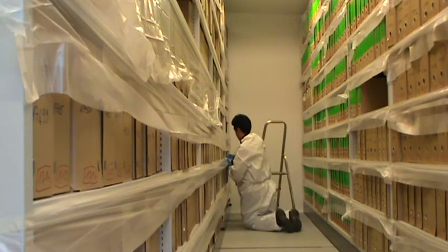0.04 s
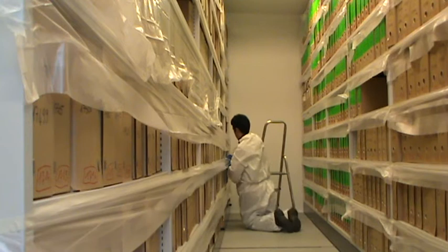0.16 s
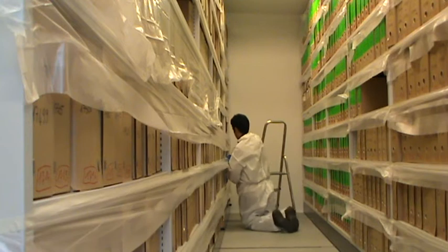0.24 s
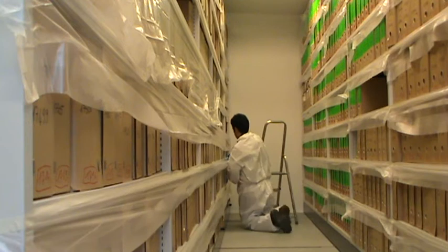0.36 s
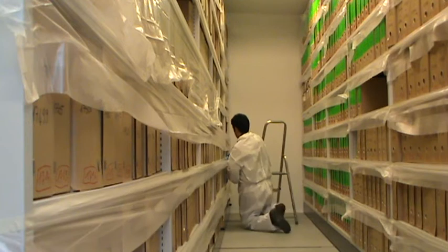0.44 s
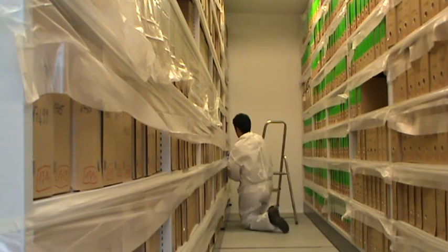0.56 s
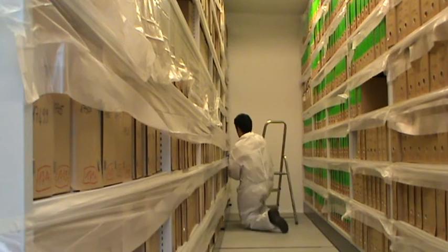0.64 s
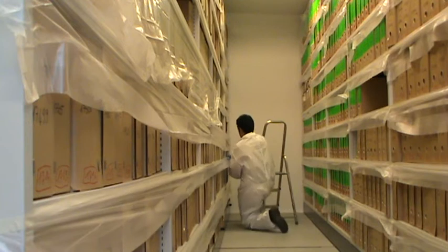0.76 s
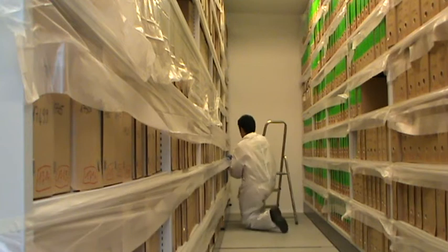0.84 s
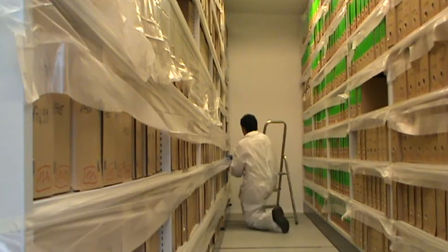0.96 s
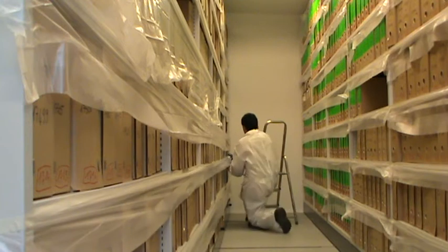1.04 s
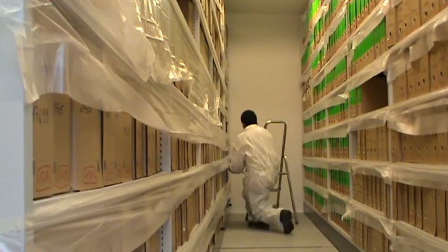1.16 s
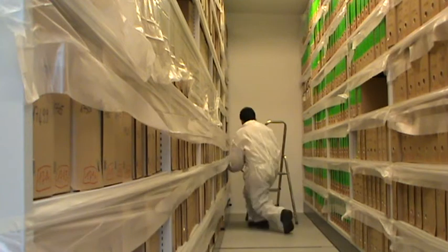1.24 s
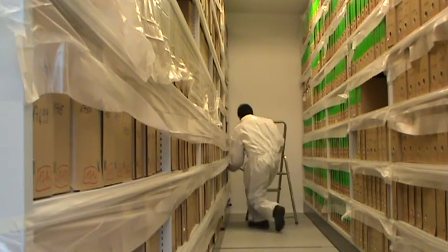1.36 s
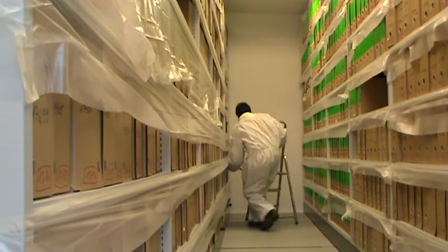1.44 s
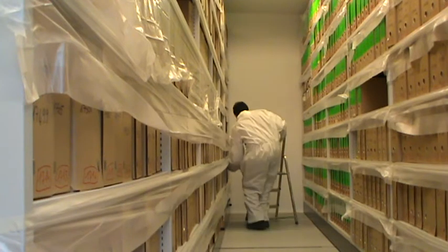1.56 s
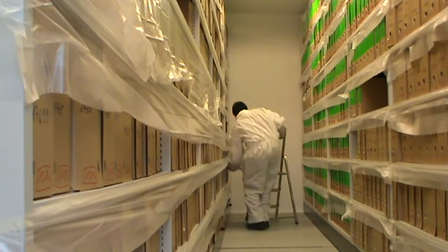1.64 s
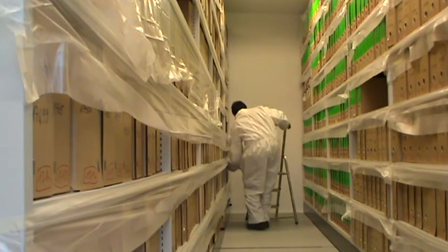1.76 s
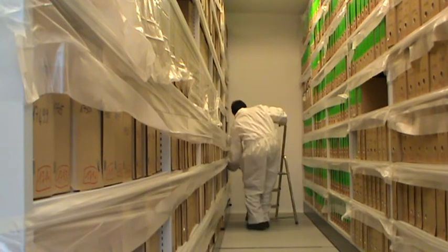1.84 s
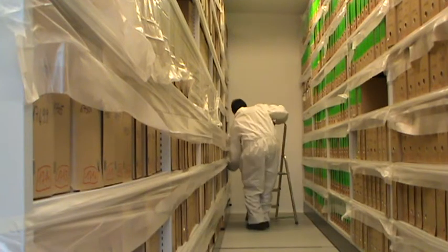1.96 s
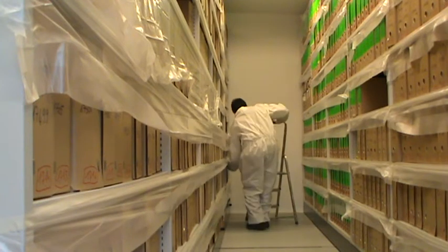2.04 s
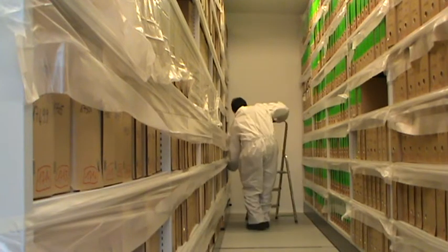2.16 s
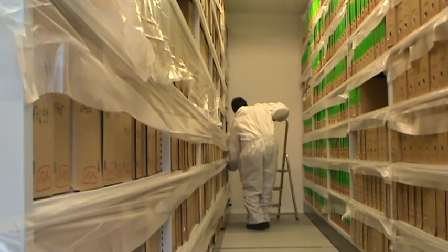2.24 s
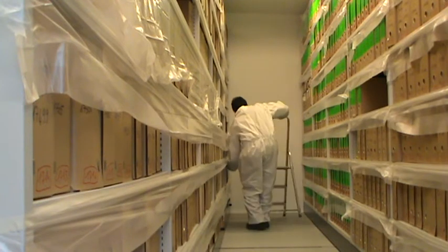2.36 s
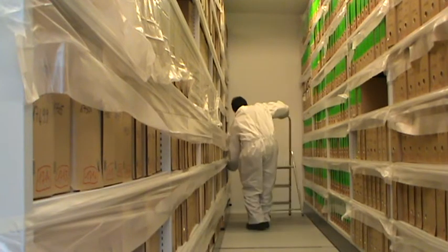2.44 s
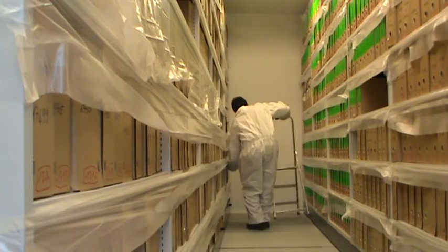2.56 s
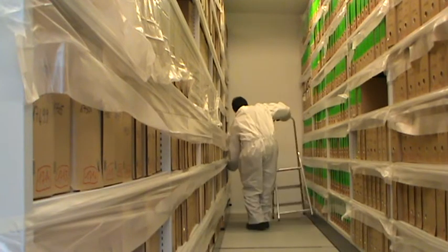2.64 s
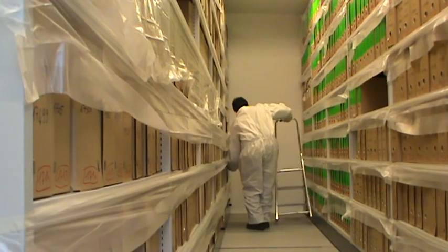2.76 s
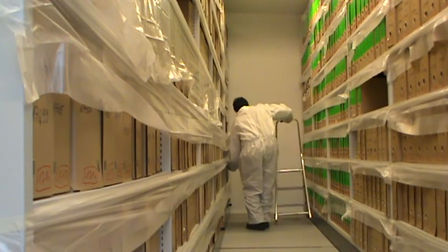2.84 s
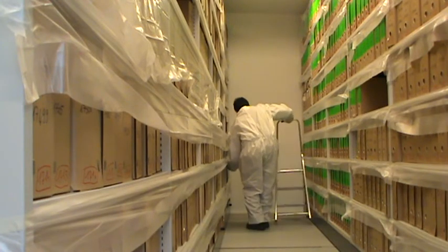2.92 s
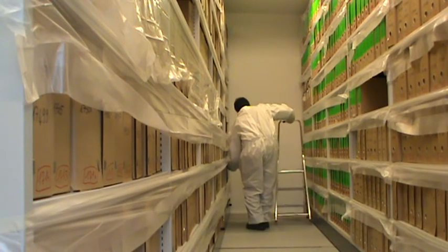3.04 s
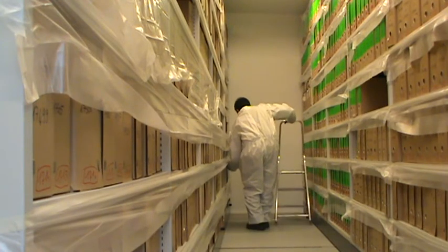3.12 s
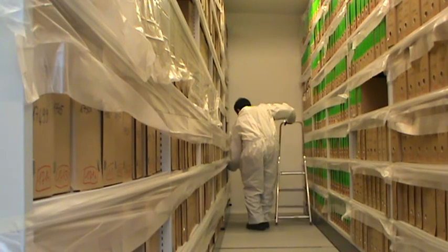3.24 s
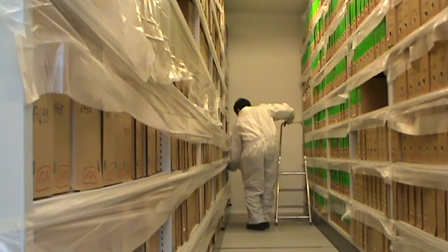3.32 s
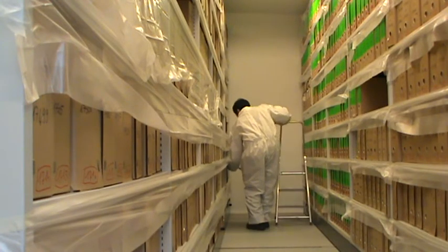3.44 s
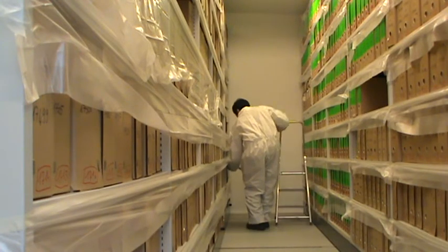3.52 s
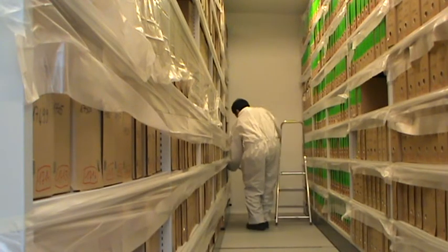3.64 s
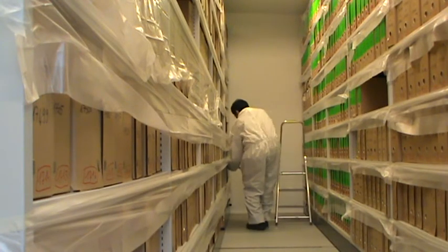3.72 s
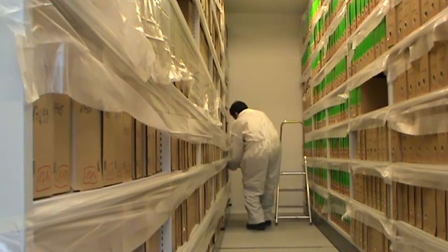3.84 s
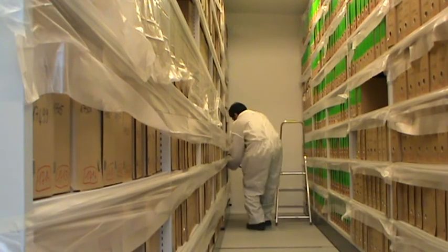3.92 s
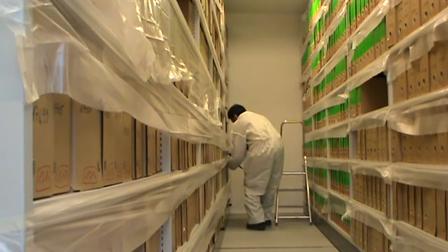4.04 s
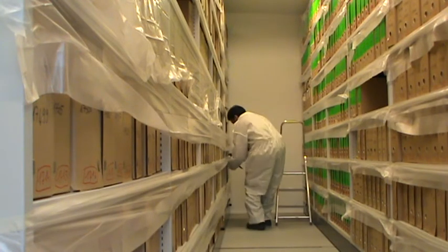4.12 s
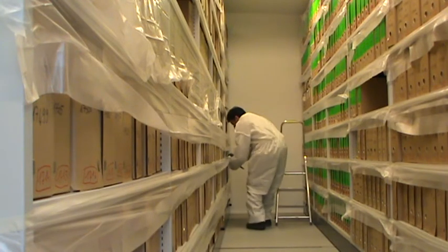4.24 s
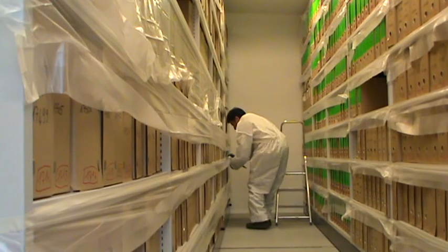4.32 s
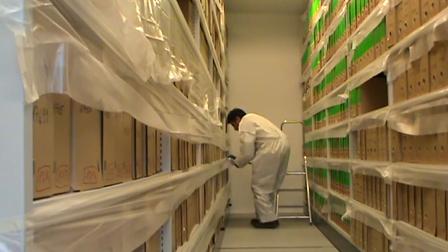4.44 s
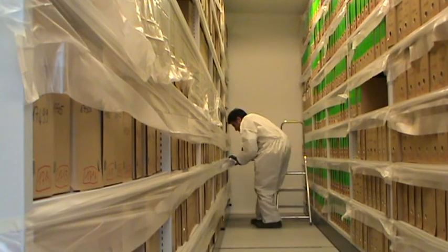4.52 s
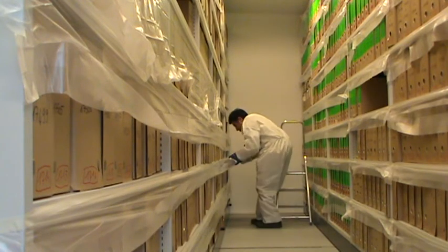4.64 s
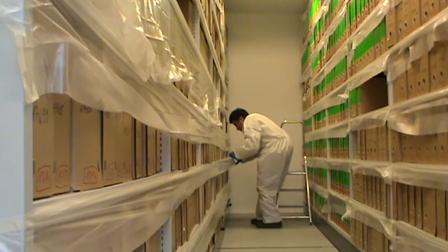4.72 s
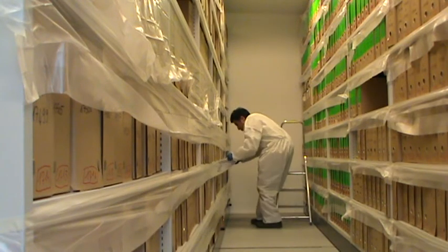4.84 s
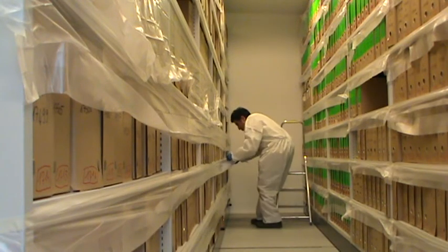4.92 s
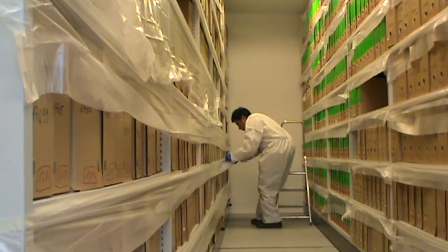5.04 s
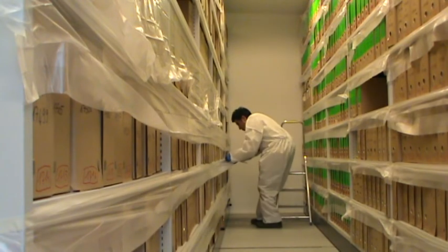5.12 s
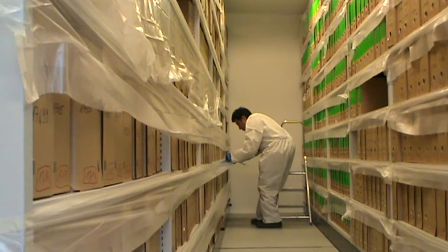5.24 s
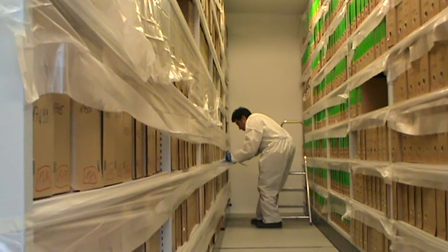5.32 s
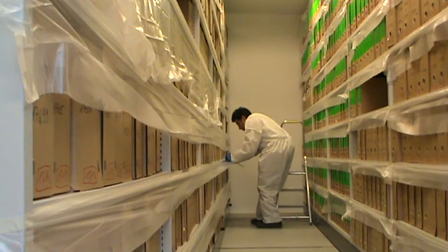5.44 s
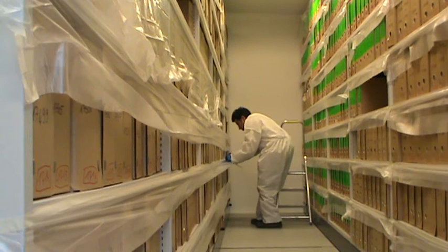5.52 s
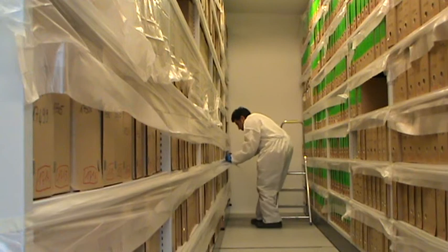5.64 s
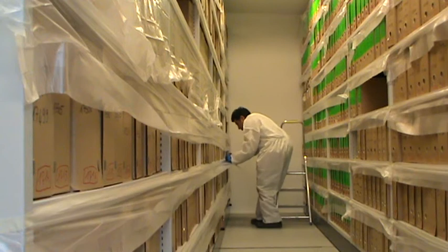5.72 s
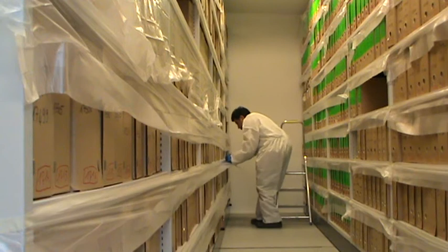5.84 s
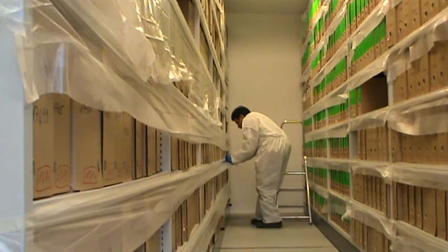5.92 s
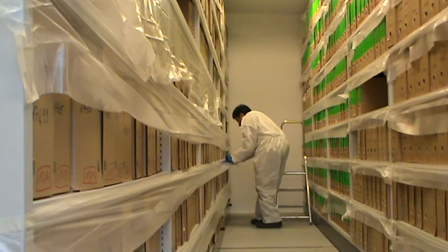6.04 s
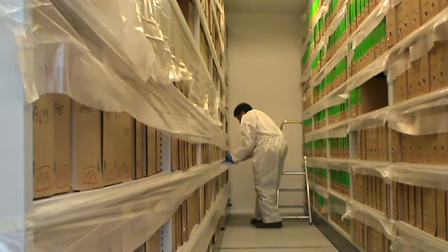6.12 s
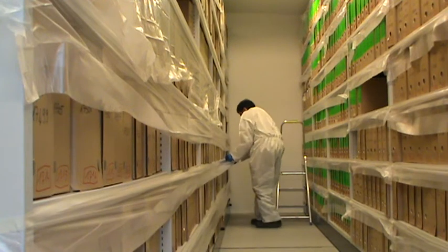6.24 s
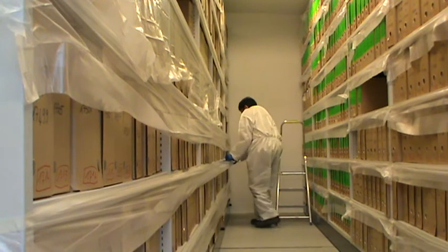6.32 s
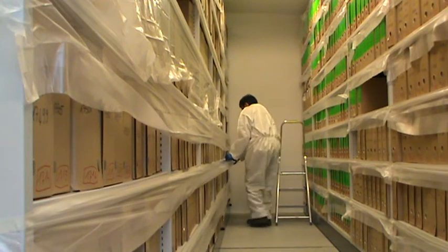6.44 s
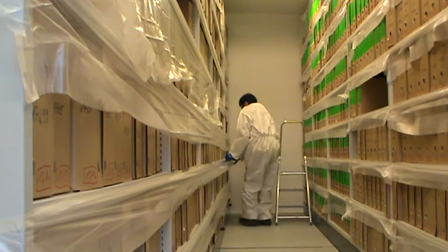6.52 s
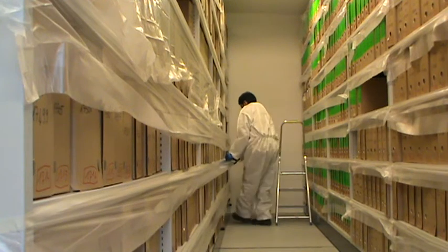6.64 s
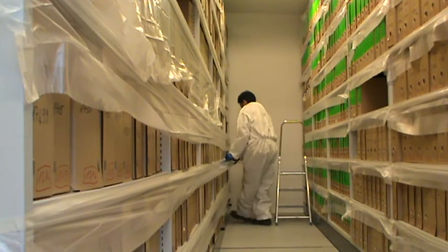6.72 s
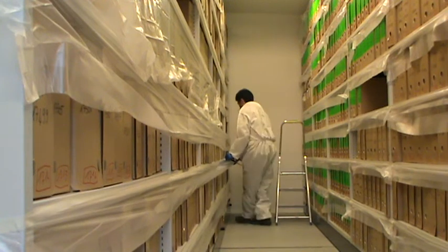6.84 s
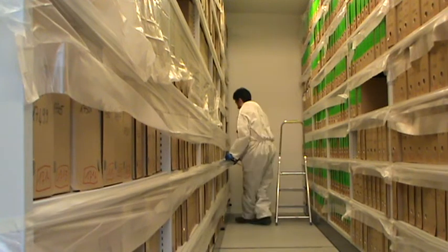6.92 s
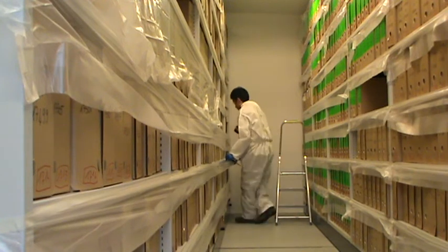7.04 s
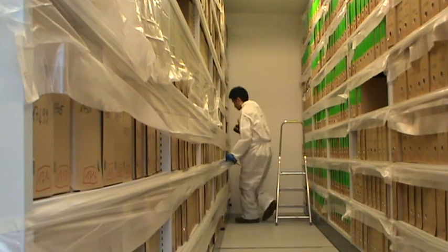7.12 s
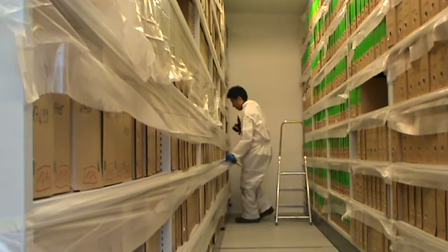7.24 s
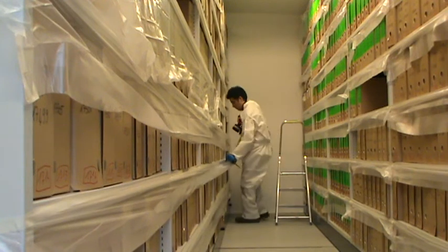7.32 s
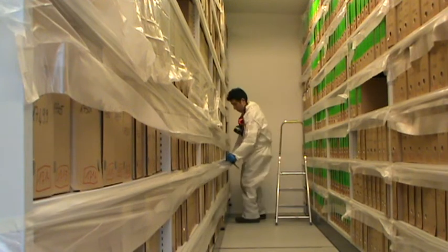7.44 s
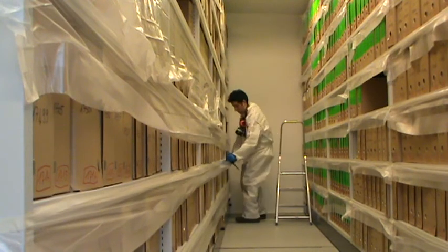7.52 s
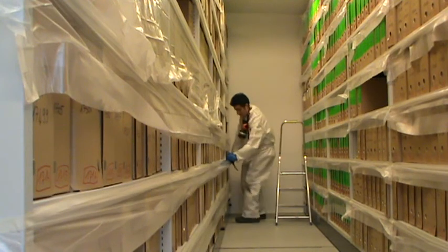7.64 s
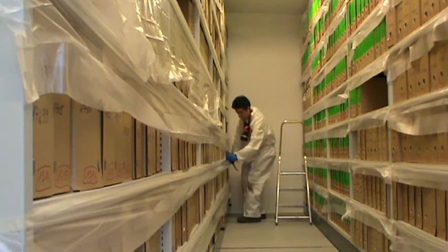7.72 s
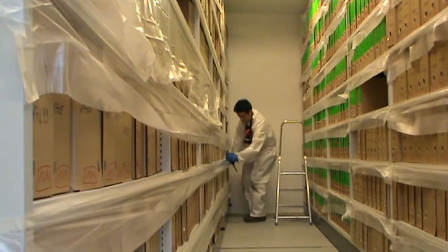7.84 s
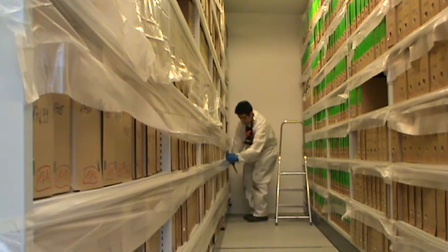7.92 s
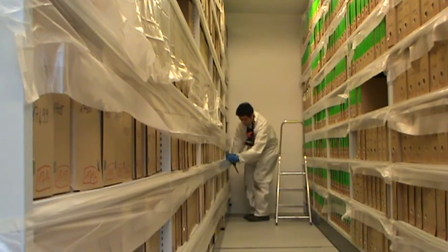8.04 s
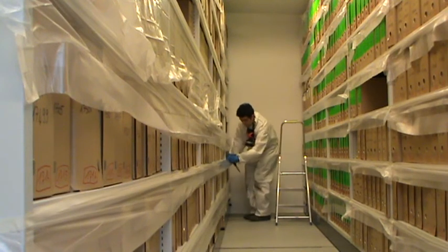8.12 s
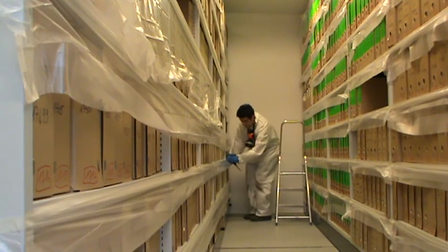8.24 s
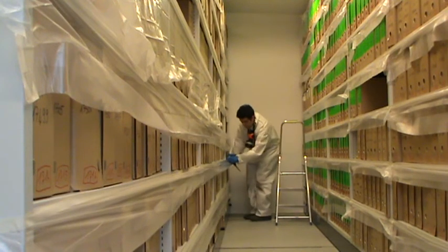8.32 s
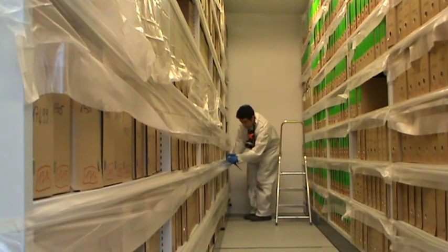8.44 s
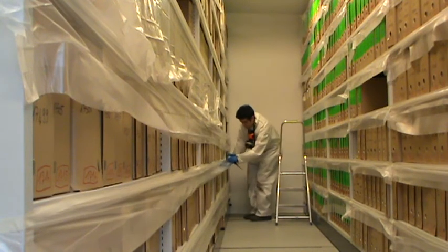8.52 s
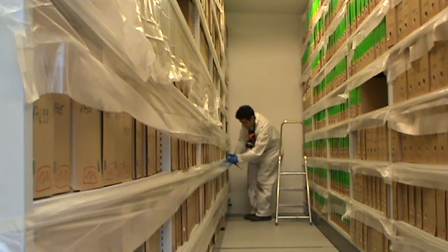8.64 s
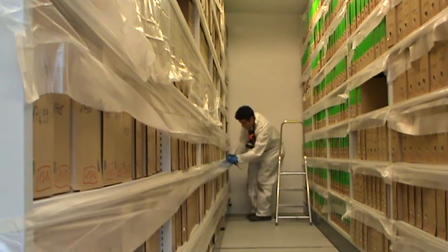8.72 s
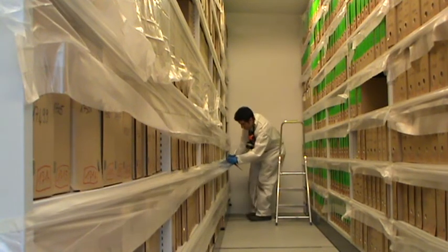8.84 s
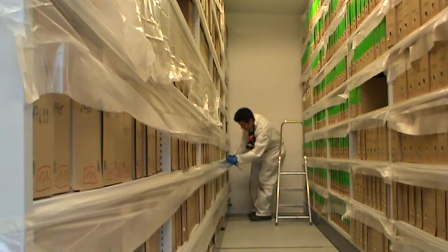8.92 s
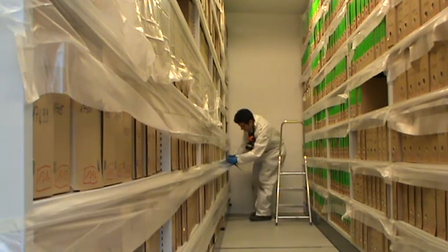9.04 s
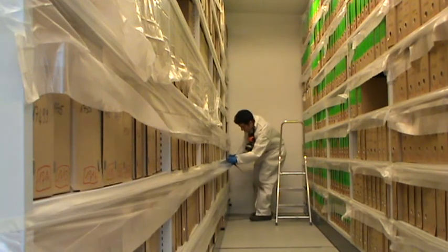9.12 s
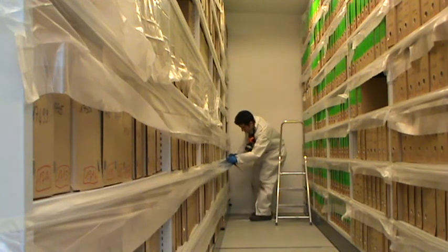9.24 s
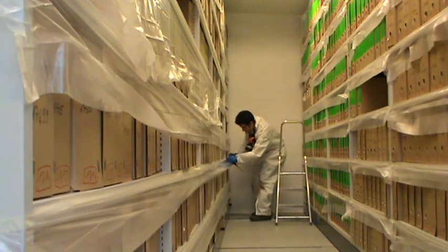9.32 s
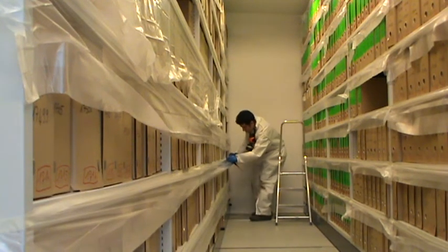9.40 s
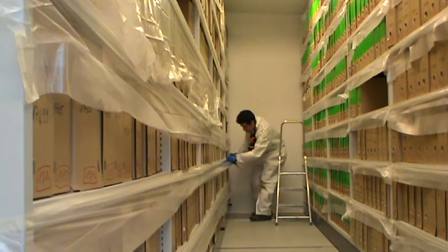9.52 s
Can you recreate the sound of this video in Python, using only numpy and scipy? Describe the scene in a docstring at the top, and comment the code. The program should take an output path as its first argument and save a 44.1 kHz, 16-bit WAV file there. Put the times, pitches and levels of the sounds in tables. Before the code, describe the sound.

A metal stepladder rattles and clanks in a narrow storage aisle, then thin plastic sheeting crinkles and swishes as a worker tucks and smooths it.

```python
"""Metal rattles and plastic film crinkles: a worker in a storage aisle shifts a stepladder and smooths sheeting.
Ladder jolts are bursts of random contacts ringing tube modes; bumps are short decaying tones, scuffs banded ticks.
Film is random buckles and rubbing noise, swelled by each tuck or wipe; noise bursts snap, slipping tones squeak.
Aisle reverberation blurs the work; ventilation, hiss and a faint electronic whine lie beneath."""
import sys
import numpy as np
from scipy import signal
from scipy.fft import rfft, irfft, next_fast_len
from scipy.io import wavfile
from scipy.ndimage import uniform_filter1d, map_coordinates

SR = 44100
rng = np.random.default_rng(int(sys.argv[2]) if len(sys.argv) > 2 else 0)


def int16_out(signal):
    """Quantize to a 16-bit WAV file."""
    q = np.round(np.clip(np.atleast_2d(signal).T, -1, 1) * 32767)
    wavfile.write(sys.argv[1], SR, q.astype(np.int16))


N = 422037
TOP_HZ = 15870  # band limit
WIPE_SHAPE = 1.81  # swell exponent: 1 = pointed, 2 = rounded

# left-right likeness of the aisle reverberation and the film rubbing: freq_hz, likeness
ALIKE = [(60, 1), (250, 1), (500, 0.92), (750, 0.87), (1220, 0.72), (2000, 0.54), (3300, 0.54),
         (5500, 0.73), (9000, 0.67), (14000, 0.94)]
# palm wipes, hollow tone sinking: peak_s, rustle_db, rise_s, fall_s,
# billow_db and sizzle_db (over rustle), tone_hz (at peak), sink_octaves_per_s, lift_db
WIPES = [(4.52, -36, 0.079, .11, -14, -6, 2050, 0.25, 2.3),
         (5.255, -60.5, 0.047, 0.11, -14, 12.5, 4450, .5, 6.3),
         (5.94, -32.5, .14, 0.15, -11, 6, 1180, 1.6, 7.2),
         (6.07, -33, 0.13, 0.19, -6.5, 2, 1740, 0.44, 4.3),
         (7.9, -35, 0.11, 0.16, -15, -4.5, 1780, .2, 3.7),
         (8.971, -28.5, 0.25, 0.24, -13, 4.5, 950, 2, 8.3),
         (9.17, -27, 0.23, .29, -14.5, .5, 550, 2.6, 2.1)]


def amp(db):
    """Decibels to gain."""
    return 10 ** (np.asarray(db) / 20)


def unit(x):
    """x at rms 1."""
    return x / np.sqrt(np.mean(x ** 2) + 1e-20)


def along(points, hz):
    """(Hz, value) points read on a log axis."""
    f, v = np.transpose(points)
    return np.interp(np.log(hz + 1), np.log(f), v)


def curves(rows, t):
    """Each column after the first, interpolated at the times t."""
    s, *cols = np.transpose(rows)
    return [np.interp(t, s, c) for c in cols]


def filtered(x, response):
    """x times a response of frequency."""
    n = x.shape[-1]
    m = next_fast_len(n + SR // 4)
    spectrum = rfft(x, m) * response(np.fft.rfftfreq(m, 1 / SR))
    return irfft(spectrum, m)[..., :n]


def add(track, s, sound):
    """Mix a sound into the track at s seconds."""
    start = max(round(s * SR), 0)
    track[:, start:start + sound.shape[1]] += sound[:, :N - start]


def stereo(pair, alike):
    """Mid and side from two unrelated signals; likeness by frequency, held at -0.8 or above."""
    width = lambda hz: np.tan(np.arccos(np.clip(along(alike, hz), -.8, 1)) / 2)
    side = filtered(pair[1], width)
    return np.array([pair[0] + side, pair[0] - side])


def aisle(x, direct_db):
    """Direct sound plus dense reverberation: noise decaying at a frequency-dependent rate, treble first."""
    # reverberation time: freq_hz, t60_s
    decay_times = [(150, 0.42), (500, 0.49), (1300, 0.52), (3000, 0.47), (6000, 0.44), (10000, 0.3),
                   (15000, 0.15)]
    hz, t, z = signal.stft(rng.standard_normal((2, SR // 2)), SR, nperseg=256)
    decay = amp(-60 * t / along(decay_times, hz)[:, None])
    tail = signal.istft(z * decay, SR)[1]
    tail = stereo(tail / np.linalg.norm(tail[0]), ALIKE)
    tail[:, 0] += amp(direct_db)
    return signal.fftconvolve(x[None], tail / np.linalg.norm(tail[0]), axes=1)


def ticks(size, rate, spread_db):
    """Random-time impulses (rate per s) of random sign and uneven strength."""
    chance, strength = rng.random(size), rng.standard_normal(size)
    level = amp(spread_db * np.clip(strength, -2, 2))
    return (chance < rate / SR) * rng.choice([-1, 1], size) * level


def background():
    """Quiet ventilation and microphone hiss as shaped noise; thin electronic whine as a steady sine."""
    # spectrum shape: freq_hz, relative_db
    floor_spectrum = [(12, -44), (20, -14), (54, -4.5), (76, -9.5), (92, -12), (185, -9), (289, -10.5),
                      (323, -10), (463, -16.5), (2990, -15.5), (3530, -17.5), (6150, -18), (14600, -21.5),
                      (15600, -14)]
    # left-right likeness: freq_hz, likeness
    air_alike = [(60, 0.94), (130, 0.42), (290, -0.28), (640, -1), (1410, -0.47), (3100, -0.021),
                 (6800, 0.29), (15000, 1)]
    air_db, whine_db, whine_hz = -50.5, -59, 15625  # air rms, whine peak
    noise = stereo(rng.standard_normal((2, N)), air_alike)
    air = filtered(noise, lambda hz: amp(along(floor_spectrum, hz)))
    whine = amp(whine_db) * np.sin(2 * np.pi * whine_hz * np.arange(N) / SR)
    return amp(air_db) * unit(air) + whine


def bumps():
    """Feet, knees and ladder on the floor: three partials, damped within milliseconds, stir the room."""
    # dull blows: start_s, level_db (nominal), pitch_hz
    blows = [(.01, -46, 151), (0.717, -37.5, 490), (0.932, -33, 334), (1.093, -43, 258),
             (1.579, -38.5, 226), (1.719, -42.5, 230), (2.108, -28, 316), (2.714, -34, 242),
             (2.911, -32, 331), (3.264, -38, 323), (3.304, -20.5, 340), (4.199, -36, 307.7),
             (4.604, -46.5, 272), (4.65, -47, 172), (6.894, -45, 303), (6.926, -37.5, 516),
             (6.954, -45, 200), (7.41, -52, 254), (7.477, -47, 285), (7.524, -46, 342), (7.99, -48, 322)]
    out, t = np.zeros((2, N)), np.arange(SR // 8) / SR
    attack_s, decay_s = 0.0048, 0.0078
    envelope = (1 - np.exp(-t / attack_s)) * np.exp(-t / decay_s)
    for s, db, hz in blows:
        tone = np.sin(2 * np.pi * hz * t)
        tone += 0.34 * np.sin(2 * np.pi * hz * 0.666 * t)
        tone += 0.37 * np.sin(2 * np.pi * hz * 1.4 * t)
        add(out, s, amp(db + 10.5) * aisle(tone * envelope, direct_db=7))
    return out


def scuffs():
    """A sole grinds over fine grit: a short spray of ticks in one broad band."""
    # shoe scuffs: start_s, level_db (nominal), length_s (to 1/e), centre_hz, half_width_octaves (to 1/e)
    grinds = [(1.562, -33, 0.071, 4500, 1.8), (1.581, -26.5, 0.066, 1870, 1.4),
              (1.594, -29, .05, 5270, 1.2), (2.044, -31, 0.047, 4100, 0.81),
              (2.052, -32, 0.095, 1280, 1.76), (2.099, -28, 0.058, 830, 1.4),
              (2.102, -38, 0.022, 3000, 1.9)]
    out, t = np.zeros((2, N)), np.arange(SR // 5) / SR
    onset = 1 - np.exp(-t / 0.0054)
    for s, db, length, hz, octaves in grinds:
        band = lambda f: np.exp(-(np.log2((f + 1) / hz) / octaves) ** 2)
        grit = unit(filtered(ticks(len(t), rate=2900, spread_db=3.5), band))
        spray = grit * onset * np.exp(-(t / length) ** 2)
        add(out, s, amp(db - 2.0) * aisle(spray, direct_db=1.5))
    return out


def scrapes():
    """A juddering ladder foot holds one frame resonance at a wavering pitch: sine plus its reverberation."""
    # dragged feet: start_s, length_s, pitch_hz, waver_hz (rms, nominal), level_db (dry tone)
    drags = [(.945, 0.22, 1145, 36, -37), (2.76, 0.11, 1378, 14, -25.5), (2.767, 0.23, 2650, 31, -24.5),
             (2.77, 0.099, 1230, 10, -39), (2.71, 0.083, 235, 18, -37), (3.315, 0.065, 182, 3, -32)]
    out = np.zeros((2, N))
    for s, length, hz, waver_hz, db in drags:
        t = np.arange(int(length * SR)) / SR
        waver = unit(uniform_filter1d(rng.standard_normal(SR // 2), size=200))[:len(t)]
        phase = 2 * np.pi * np.cumsum(hz + waver_hz * waver) / SR
        tone = np.sin(phase) * signal.windows.tukey(len(t))
        add(out, s, amp(db) * tone[None])
        add(out, s, amp(db - 7.0) * aisle(tone, direct_db=-22))
    return out


def ladder():
    """Each jolt sets the loose joints of both rails chattering; the contacts ring the tubes and treads."""
    # jolts: start_s, level_db (nominal), body_db, treble_db, rattle_s (to 1/e)
    jolts = [(.033, -22.5, 3.5, -9, 0.024), (.25, -36, 5.5, -27, 0.024), (0.941, -34, 9, -1, 0.071),
             (.965, -21.5, -2, -10, 0.037), (1.04, -25, 1, -16, 0.018), (1.086, -21.5, 3.5, -5.5, 0.02),
             (1.385, -34, 6, -14, 0.03), (2.101, -29.5, -11, -16, 0.016), (2.712, -21, 6, 1, 0.02),
             (2.723, -9.5, -1, 3, 0.029), (2.76, -11.5, 1, -5, 0.07), (2.82, -8, -9, -6, 0.04),
             (2.886, -19.5, -1, -11, 0.099), (3.19, -40.5, 9.5, -18, 0.038), (3.237, -29, 0, -9, 0.05),
             (3.278, -19, -4, -14, 0.085), (3.312, -13, 4, -1, 0.039), (3.334, -10, -7, -2.5, 0.056),
             (3.41, -8, -2.5, -5.5, 0.02), (3.847, -45.5, 11, -30, 0.095)]
    # tube and tread resonances: mode_hz, width_hz, relative_db
    tube_modes = [(546, 31, -9.5), (619, 17, -1.5), (760, 13, -8), (895, 18, -4.5), (956, 22, 0),
                  (1073, 16, 6), (1127, 20, 7.5), (1229, 15, 4), (1363, 12, 2), (1490, 18, -28),
                  (1630, 18, -8), (1830, 360, -5), (2180, 56, -6.5), (2544, 14, 3), (2513, 46, -4),
                  (2750, 68, -5), (3045, 110, -4.5), (3910, 79, -9), (4150, 64, -17), (4020, 22, -6),
                  (4450, 23, -28), (4760, 68, -25), (5040, 130, -29)]
    # metal-on-metal spectrum: freq_hz, relative_db
    contact_spectrum = [(59, -60), (100, -19.5), (177, -10), (388, -15.5), (831, -1), (1010, -12.5),
                        (1350, 0), (1540, -6.5), (2610, -6), (4720, -2), (9100, -10), (11500, -9),
                        (15800, -18)]
    out, t = np.zeros((2, N)), np.arange(SR // 6) / SR
    onset = 1 - np.exp(-t / .005)
    for s, db, body_db, treble_db, length in jolts:
        rails = ticks((2, len(t)), rate=1800, spread_db=5.5) * onset * np.exp(-(t / length) ** 2)
        rails *= np.sqrt(length * SR) / (np.linalg.norm(rails) + 1e-9)
        tilt_points = [(700, body_db), (1800, 0), (4000, 0), (10000, treble_db)]
        tilted = filtered(rails, lambda hz: amp(along(tilt_points, hz)))
        add(out, s, amp(db) * sum(aisle(rail, direct_db=-4) for rail in tilted))

    def ringing(f):
        """Sum of damped resonators."""
        return sum(amp(db) * 1j * f * w / (c * c - f * f + 1j * f * w) for c, w, db in tube_modes)

    contact_db, ring_db = 0.48, 5.5
    response = lambda f: amp(along(contact_spectrum, f)) * (amp(contact_db) + amp(ring_db) * ringing(f))
    return filtered(out, response)


def snaps():
    """A crease flips over with a short bright crack: a fast-decaying noise burst."""
    # snapping creases: start_s, level_db (nominal)
    cracks = [(2.114, -35), (4.108, -41), (4.702, -33), (4.732, -22.5), (4.744, -22), (5.406, -35),
              (5.427, -32), (5.691, -33), (5.752, -26), (6.499, -33), (6.674, -52), (6.722, -38),
              (6.953, -36), (7.294, -38), (8.595, -21.5)]
    out, t = np.zeros((2, N)), np.arange(SR // 20) / SR
    for s, db in cracks:
        crack = rng.standard_normal(len(t)) * np.exp(-t / 0.0045)
        add(out, s, amp(db - 6.5) * aisle(crack, direct_db=-3.5))
    bright_points = [(400, -12), (1500, 1), (7000, 3.5), (15000, 5.5)]
    return filtered(out, lambda hz: amp(along(bright_points, hz)))


def chirps():
    """The glove catches on the film for an instant: tiny slips as a brief sine of unsteady pitch."""
    # catches: start_s, length_s, pitch_hz (mean, nominal), level_db (nominal)
    catches = [(4.729, .014, 6350, -35), (5.243, 0.049, 4400, -48), (5.25, .03, 5750, -47),
               (5.402, 0.027, 2140, -53), (6.485, .025, 1900, -49), (6.57, 0.028, 1215, -47)]
    pitch_waver = .03  # share of pitch
    out = np.zeros((2, N))
    for s, length, hz, db in catches:
        n = int(length * SR)
        waver = unit(uniform_filter1d(rng.standard_normal(SR // 4), size=60))[:n]
        phase = 2 * np.pi * np.cumsum(hz * (1 + pitch_waver * waver)) / SR
        tone = np.sin(phase) * np.hanning(n)
        add(out, s, amp(db) * aisle(tone, direct_db=3))
    return out


def squeak():
    """Stick and slip of the taut film: a pulse train that glides down and breaks up into a rasp."""
    # slip glide: time_s, slips_per_s (before jitter), level_db (nominal), roughness (0-1)
    glide = [(5.414, 12200, -41, 0.13), (5.43, 11100, -27, 0.06), (5.463, 10200, -35, .09),
             (5.467, 7400, -39, 0.15), (5.481, 6750, -38, .1), (5.502, 6480, -31, 0.17),
             (5.511, 5200, -32, 0.7), (5.559, 2300, -32.5, .97), (5.604, 1300, -58, 1)]
    t = np.arange(glide[0][0], glide[-1][0], 1 / SR)
    rate, db, rough = curves(glide, t)
    jitter = .35 * rough * unit(uniform_filter1d(rng.standard_normal(len(t)), size=14))
    phase = 2 * np.pi * np.cumsum(rate * np.exp(jitter)) / SR
    overtones = sum(np.sin(k * phase) * (k * rate < TOP_HZ) / k ** 0.23 for k in range(2, 11))
    slips = unit(np.sin(phase) + (3.2 - 1.94 * rough) * overtones)
    # grip comes and goes in small jerks
    grip = amp(2.2 * unit(uniform_filter1d(rng.standard_normal(len(t)), size=300)))
    rasp = 0.11 * rough * rng.standard_normal(len(t))
    out = np.zeros((2, N))
    add(out, t[0], aisle(amp(db - 1) * grip * (slips + rasp), direct_db=-2))
    return out


def swell(t, peak_s, rise_s, fall_s, shape):
    """Pressure of one hand movement: builds to 1 and lets go; rise and fall are 1/e times."""
    return np.exp(-np.abs((t - peak_s) / np.where(t < peak_s, rise_s, fall_s)) ** shape)


def hollow(hz, t):
    """Lift in dB of the film's hollow tone: steady while the film is slack, sinking under each wipe."""
    rest_tone_hz, rest_lift_db = 1280, 2.5
    half_width_octaves = 0.66  # to 1/e
    band = lambda centre: np.exp(-((np.log2(hz[:, None] + 1) - centre) / half_width_octaves) ** 2)
    lift, slack = 0, np.ones(len(t))
    for s, _, rise, fall, _, _, tone_hz, sink, lift_db in WIPES:
        taut = swell(t, s, rise, fall, WIPE_SHAPE)
        lift = lift + lift_db * taut * band(np.log2(tone_hz) - sink * (t - s))
        slack = slack * (1 - taut)
    return lift + rest_lift_db * slack * band(np.log2(rest_tone_hz))


def crinkle():
    """Countless tiny buckles at four spots merge into a swish whose hollow tone follows the hand."""
    # film spectrum: freq_hz, relative_db
    film_spectrum = [(88, -64), (150, -28), (280, -17.5), (522, -6.5), (849, -6.5), (918, -6), (1210, -4),
                     (1300, -1.5), (1580, -3), (2120, 0.5), (2530, -3.5), (5730, -3), (9700, -7),
                     (12000, -4), (15800, -10.5)]
    # buckles come in short flurries
    flurries = amp(1.72 * unit(uniform_filter1d(rng.standard_normal(N), size=500)))
    spots = ticks((4, N), rate=350, spread_db=4.0) * flurries
    buckles = unit(sum(aisle(spot, direct_db=-11.0)[:, :N] for spot in spots))
    rubbing = unit(stereo(rng.standard_normal((2, N)), ALIKE))
    hz, frames, z = signal.stft(buckles + amp(-7) * rubbing, SR, nperseg=1024)
    colour_db = along(film_spectrum, hz)[:, None] + hollow(hz, frames)
    return signal.istft(z * amp(colour_db), SR)[1][:, :N]


def sheeting():
    """Under each tuck and wipe broad folds billow low, creases rustle and the finest wrinkles sizzle."""
    # fingers press and tuck: peak_s, rustle_db, rise_s, fall_s, billow_db and sizzle_db (over rustle)
    tucks = [(.055, -32.5, 0.12, 0.12, -13, -2.5), (.26, -42, 0.06, 0.099, -23, -3),
             (.45, -44.5, 0.12, 0.19, -1.5, 0), (.63, -42, 0.067, 0.11, 0.5, -5.5),
             (.78, -36.5, 0.17, 0.064, -11, -5.5), (1.18, -47.5, 0.26, 0.23, -6.5, -1),
             (1.39, -47.5, 0.11, 0.17, -5.5, 1.5), (1.55, -43.5, 0.065, 0.3, -2, -7),
             (1.74, -51, .07, 0.023, -7, -21), (2.02, -58, 0.034, 0.038, -2.5, -8),
             (2.36, -53, 0.053, 0.1, -4, -6), (3.7, -49, 0.12, 0.18, -5, -15),
             (3.87, -46, 0.056, 0.13, -11, -8.5), (4.12, -53.5, 0.023, 0.084, -9, 4),
             (4.22, -51.5, 0.04, 0.056, 0, -18), (4.37, -52.5, 0.079, .08, -6.5, 0.5),
             (4.76, -44.5, 0.057, 0.052, -11, -2), (4.9, -59, .06, 0.092, -3, 5),
             (5.68, -61, .02, 0.087, -19, 8), (6.33, -45.5, 0.063, 0.086, -26, 5),
             (6.4, -42.5, 0.036, 0.081, -12, 2), (6.5, -50.5, 0.037, 0.07, -7, 7.5),
             (6.66, -51, 0.2, 0.45, -3, -6), (6.94, -46.5, 0.045, .07, -7, -6.5),
             (7.13, -51, 0.13, 0.1, -7, 1.5), (7.34, -52, 0.033, 0.073, -11.5, 3),
             (7.45, -55.5, 0.048, 0.059, -7, 8.5), (7.57, -50.5, 0.13, 0.1, -6.5, 6.5),
             (8.23, -46.5, 0.095, 0.07, -6.5, -0.5), (8.46, -47.5, 0.066, 0.34, -13, 8),
             (8.71, -41, 0.052, 0.042, -10, 13), (9.55, -36, 0.081, 0.11, -10.5, 4)]
    tuck_shape = 1.22  # swell exponent
    surge_db, surge_s = 0.45, .045  # uneven hand pressure: random spread, knot spacing
    film = crinkle()
    billow = filtered(film, lambda f: 1 / (1 + (f / 850) ** 6))
    sizzle = filtered(film, lambda f: 1 - 1 / (1 + (f / 4300) ** 4))
    rustle = film - billow - sizzle
    t = np.arange(0, N / SR, .002)
    power = np.zeros((3, len(t)))
    for moves, shape in (tucks, tuck_shape), (WIPES, WIPE_SHAPE):
        for s, db, rise, fall, billow_db, sizzle_db, *_ in moves:
            levels = amp([db, db + billow_db, db + sizzle_db])
            power += np.outer(levels, swell(t, s, rise, fall, shape)) ** 2
    surges = amp(surge_db * map_coordinates(rng.standard_normal(len(t)), [t / surge_s]))
    gains = [np.interp(np.arange(N) / SR, t, surges * np.sqrt(p)) for p in power]
    return sum(gain * unit(layer) for gain, layer in zip(gains, (rustle, billow, sizzle)))


def scene():
    """All work at the far end of the aisle, almost straight ahead, over the background."""
    work = bumps() + scuffs() + scrapes() + ladder() + snaps() + chirps() + squeak() + sheeting()
    balance_db = [[.2], [-.2]]  # left, right
    return work * amp(balance_db) + background()


def record(dry):
    """The camera keeps nothing above its band limit."""
    return filtered(dry, lambda hz: hz < TOP_HZ)


dry = scene()
out = record(dry)
int16_out(out)
```